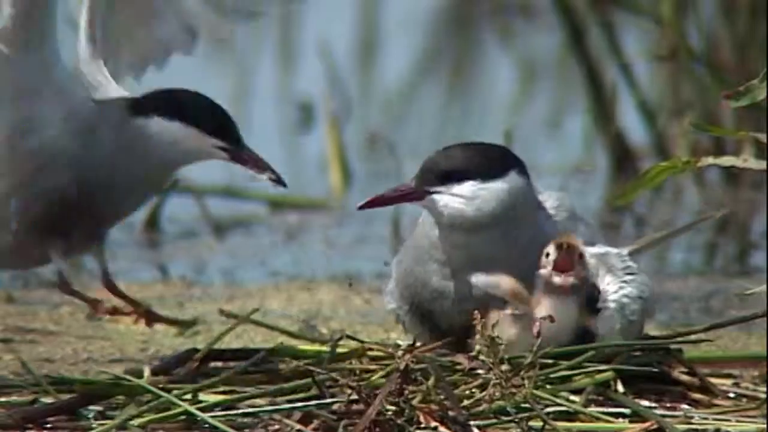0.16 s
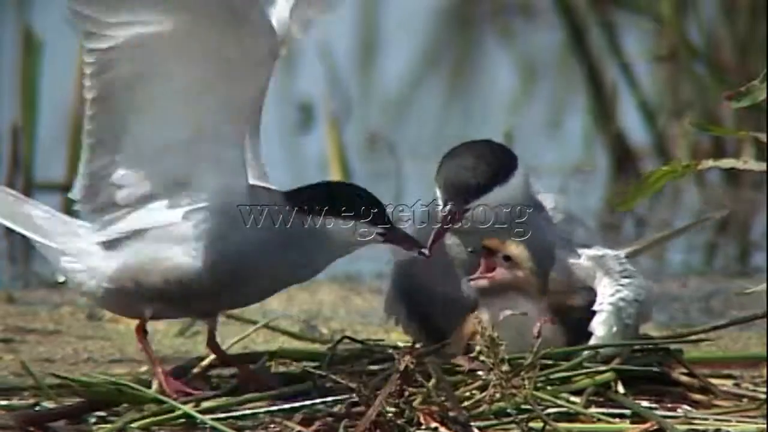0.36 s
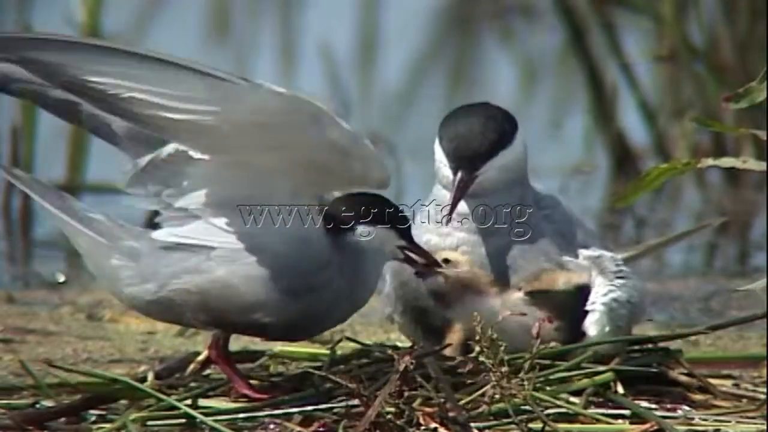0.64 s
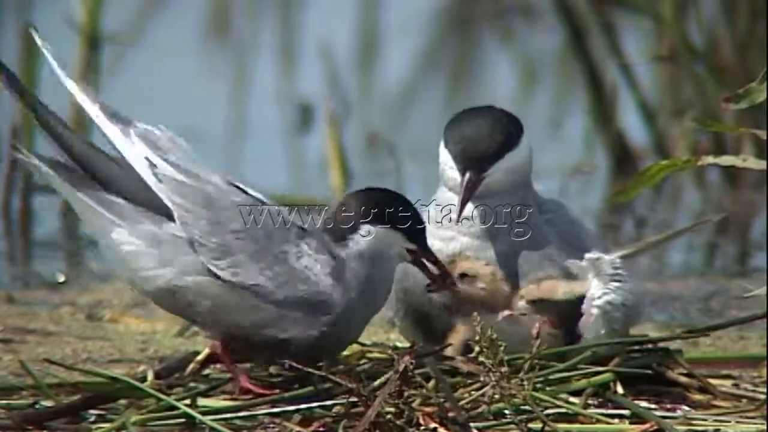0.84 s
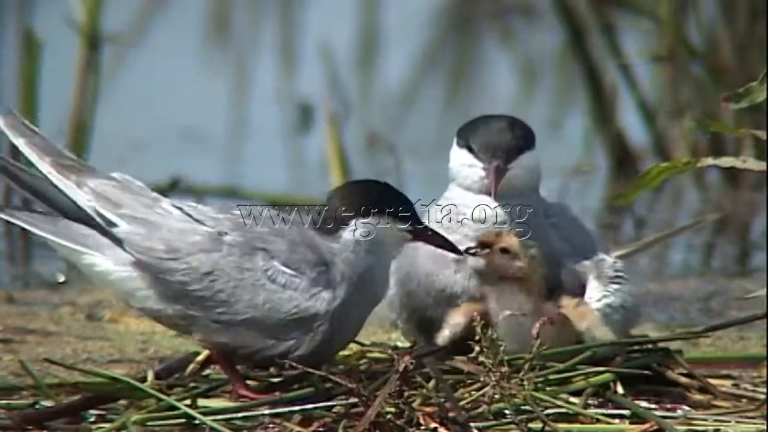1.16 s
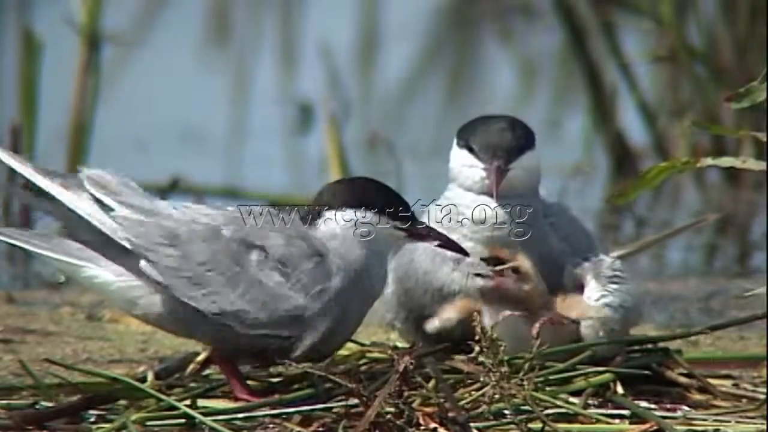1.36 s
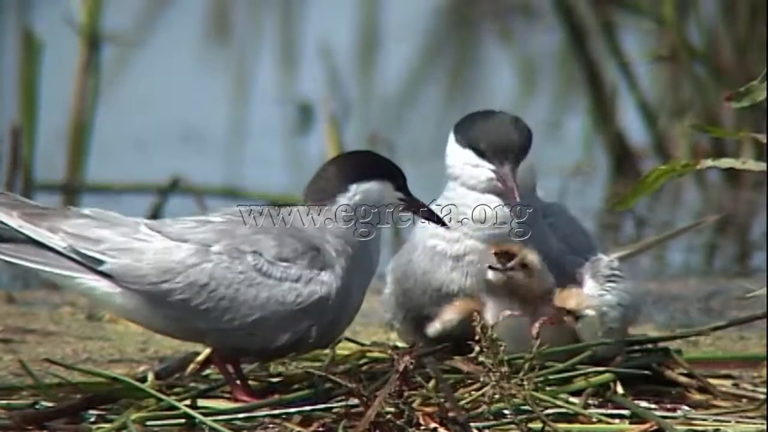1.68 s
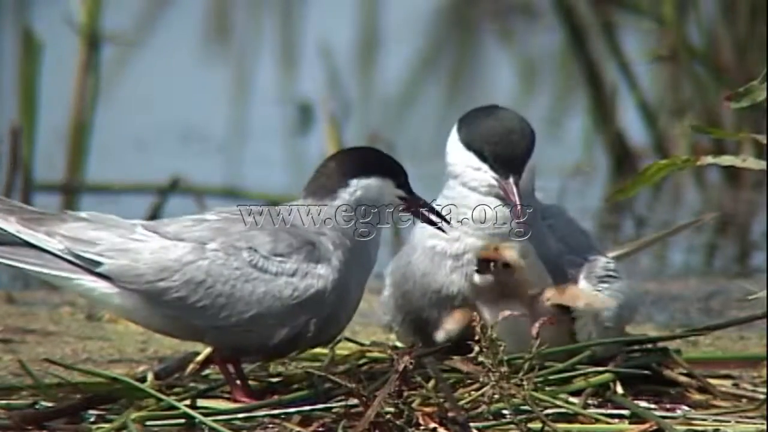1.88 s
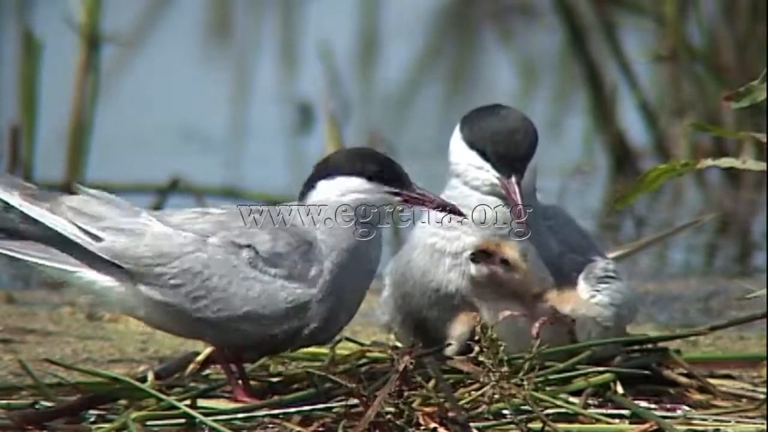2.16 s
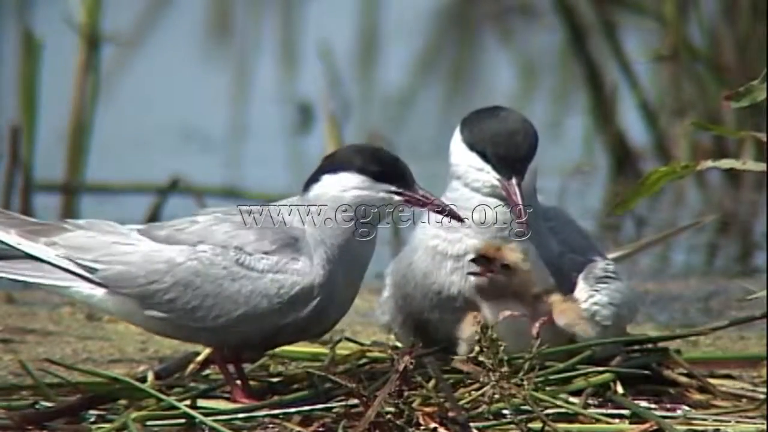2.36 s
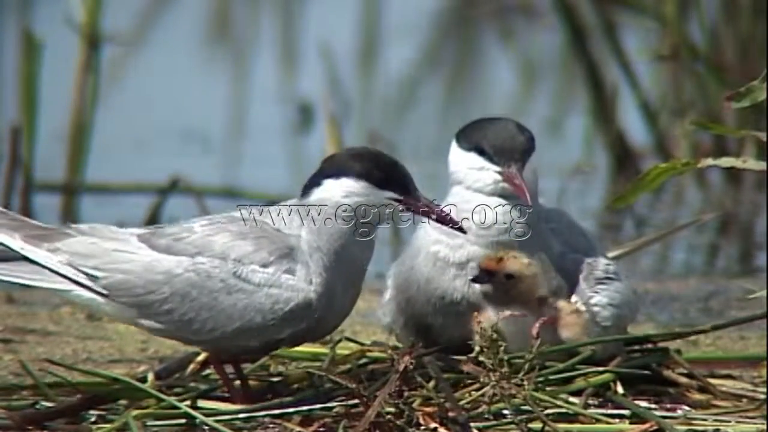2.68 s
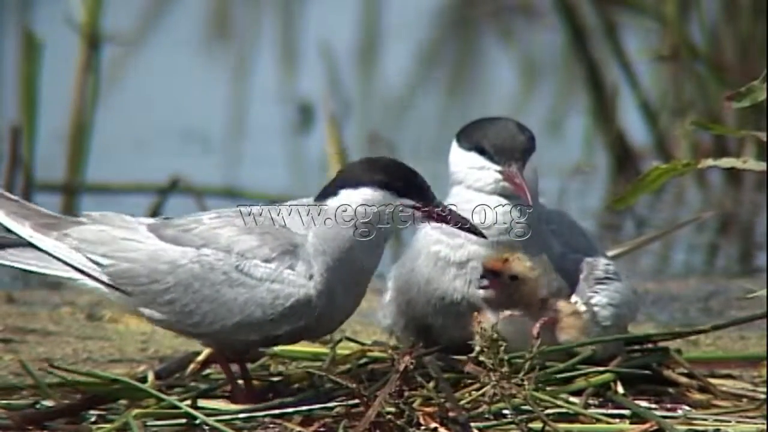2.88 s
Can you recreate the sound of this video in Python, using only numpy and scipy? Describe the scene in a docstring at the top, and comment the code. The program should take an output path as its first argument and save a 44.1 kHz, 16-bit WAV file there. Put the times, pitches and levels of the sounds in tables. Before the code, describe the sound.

Raspy tern calls at a marsh nest, with distant birds, faint peeps and low wind.

```python
"""Terns at a marsh nest

Terns rasp close by: each call is a rattle of about 100 noisy throat pulses a second.
Farther off the colony answers with rasps and whistles, chicks peep and a frog croaks in two bouts.
Wings flap, stems tick, a drop plops, and wind rumbles on the microphone."""
import sys
import numpy as np
from scipy import signal
from scipy.fft import rfft, irfft, next_fast_len
from scipy.io import wavfile

SR = 44100
rng = np.random.default_rng(int(sys.argv[2]) if len(sys.argv) > 2 else 0)


def to_wav(sig):
    """Store sig (one row per channel, or 1-D mono) as 16-bit WAV at the path in sys.argv[1].

    Samples outside -1..1 are clipped; the rate is SR.
    """
    pcm = np.clip(np.atleast_2d(sig), -1, 1) * 32767
    pcm = np.round(pcm).astype(np.int16)
    wavfile.write(sys.argv[1], SR, pcm.T)  # frames by channels


N = 133623
T = np.arange(N) / SR


def near_terns():
    """The throat opens in fluttering pulses, each a puff of air through the beak with a rough tone."""
    # Each row: start in seconds, pulse count, pulses a second, level in dB, mid-call swell in dB,
    # level change by the end in dB, first and last throat pitch in Hz, tone against breath in dB.
    calls = [(0.0691, 3, 99.4, -46, 2, -5.5, 2000, 1884, -2),
             (.127, 12, 101, -52, 1, -3.5, 3500, 2735, -12),
             (1.0059, 13, 102, -48.5, 2.5, -4, 3950, 2405, -1.5),
             (2.212, 13, 104, -58, -1.5, 2, 3700, 3280, -6)]
    # How throat and beak ring, one list per call. Each pair: frequency in Hz, level in dB.
    beaks = [
        [(530, -58), (900, -29), (1680, -13), (1840, -3.5), (2100, -5.5), (2300, -38), (2600, -5), (3760, -19),
         (4210, -31), (5620, -9), (6800, -26), (13000, -39)],
        [(530, -46), (900, -16.5), (998, -19), (1240, -24), (1960, -5), (2130, -18), (2770, -3), (3910, -10.5),
         (4290, -12.5), (6120, -9), (7190, -22), (9580, -19), (14000, -40)],
        [(530, -40), (900, -21), (964, -20), (1160, -21), (1490, -13.5), (1620, -17), (1880, -7), (2080, -8.5),
         (2230, -9), (2560, -5.5), (2770, -10.5), (3610, -11), (4650, -11.5), (5720, -16), (6710, -10.5),
         (7360, -34), (7880, -15), (8450, -23), (9150, -16.5), (10400, -30), (14000, -37)],
        [(590, -36), (1000, -19), (1350, -4), (1630, -24), (1960, 4.5), (2160, -5), (3760, 2.5), (5280, -7.5),
         (5630, -11), (9000, -44), (11700, -67), (19800, -120)],
    ]
    flutter_hz, treble_hz = 398, 5800
    out = np.zeros(N)
    for call, beak in zip(calls, beaks):
        start, count, rate, db, swell_db, fade_db, first_hz, last_hz, tone_db = call
        length = count / rate
        t = clock(length)
        progress = t / length
        cycles = rate * (t - 0.003 * (1 - np.exp(-t / 0.016)))  # the rattle starts a little slow
        within, pulse = cycles % 1, cycles.astype(int)
        strength, flutter_spread = rng.standard_normal((64, 2))[pulse].T
        opening = gate(within, 0.78 - 0.16 * progress, rise=0.1, fall=0.2)
        flutter = 1 + 0.52 * np.sin(2 * np.pi * flutter_hz * (1 + 0.24 * flutter_spread) * within / rate)
        airflow = unit(opening * flutter * undb(-0.9 * strength) + undb(-17))  # some air always leaks
        bite = unit(gate(within, 0.58, rise=0.1, fall=0.2)) * undb(-5)  # treble comes early in a pulse
        noise = rng.standard_normal(SR // 2)[:len(t)]
        low = signal.sosfiltfilt(signal.butter(3, treble_hz, fs=SR, output="sos"), noise)
        puffs = unit(tint(low * airflow + (noise - low) * bite, beak))
        hz = last_hz + (first_hz - last_hz) * np.exp(-(t / 0.018) ** 2)
        sag = 0.28 * (within - 0.34)  # the pitch drops during each pulse
        phase = turn(hz * (1 - sag + 0.0532 * wander(1500, len(t))))
        tone = unit(np.sin(phase) + undb(-17) * np.sin(2 * phase) + undb(-22) * np.sin(3 * phase))
        voice = (puffs + undb(tone_db) * tone * airflow) / np.hypot(1, undb(tone_db))
        level = undb(db + swell_db * np.sin(np.pi * progress) + fade_db * progress)
        add(out, start, voice * gate(t, length, 0.00024, 0.0028) * level)
    return out


def colony():
    """Farther terns rasp: uneven puffs of air ring in the throat at a sliding pitch."""
    # Each row: start and length in seconds, level in dB, first and last pitch in Hz,
    # width of the noise band in Hz, pulses a second.
    rasps = [(0.098, 0.042, -52.5, 3000, 3290, 1280, 100), (0.237, .07, -62.5, 2900, 2506, 2300, 110),
             (.24, 0.078, -63, 5900, 5770, 1410, 100), (0.336, 0.044, -65.5, 7000, 7040, 2430, 170),
             (0.238, 0.23, -76, 7560, 7600, 2480, 130), (.54, .11, -81.5, 9800, 10000, 910, 120),
             (0.44, 0.029, -60.5, 6800, 6070, 1490, 210), (0.539, .11, -59, 3200, 2266, 1220, 100),
             (0.547, 0.077, -69, 6100, 5650, 700, 120), (0.636, 0.12, -64, 5200, 5700, 613, 150),
             (0.699, 0.052, -55, 2500, 2182, 2130, 140), (0.73, 0.077, -65.5, 5600, 5130, 554, 130),
             (0.747, 0.028, -61.5, 2400, 2275, 1480, 99), (0.962, 0.062, -66.5, 2400, 2440, 1700, 150),
             (1.135, 0.16, -64.5, 3300, 2700, 1920, 110), (1.289, 0.051, -59, 2100, 2026, 1400, 95),
             (1.333, .025, -68, 6200, 5940, 1010, 210), (1.375, 0.087, -67.5, 5750, 5930, 805, 130),
             (1.431, 0.11, -67.5, 3900, 3360, 1400, 120), (1.541, 0.053, -59.5, 2100, 1905, 1480, 144),
             (1.575, 0.092, -60.5, 5900, 5270, 1060, 158), (1.597, 0.063, -63.5, 2700, 2210, 1000, 170),
             (1.71, 0.26, -73.5, 3700, 3810, 786, 100), (1.791, 0.064, -77, 6600, 6540, 900, 150),
             (1.948, 0.077, -65.5, 2550, 2407, 600, 110), (2.091, 0.047, -59.5, 2100, 2527, 1690, 118),
             (2.149, 0.074, -61, 3600, 3540, 1370, 110), (2.214, .035, -53, 3700, 3397, 1280, 100),
             (2.271, 0.072, -59.5, 3660, 3000, 2000, 125), (2.315, 0.074, -54, 2597, 2470, 1230, 97),
             (2.541, 0.11, -72, 6100, 5550, 820, 150), (2.683, 0.061, -62, 3500, 3060, 1190, 140),
             (2.755, 0.089, -73, 5900, 5670, 700, 220), (2.83, 0.056, -66, 4000, 3600, 1220, 130),
             (2.84, 0.17, -75, 6400, 6300, 1090, 98), (2.94, 0.07, -64.5, 3800, 3460, 890, 124)]
    out = np.zeros(N)
    for start, length, db, first_hz, last_hz, width_hz, rate in rasps:
        t = clock(length)
        hz = np.linspace(first_hz, last_hz, len(t))
        rattle = 1 + 0.62 * np.sin(turn(rate * (1 + 0.098 * wander(90, len(t)))))
        pulses = unit(rattle * undb(2.3 * wander(110, len(t))))
        voice = resonance(hz, width_hz, len(t)) + undb(-21) * resonance(hz, 6800, len(t))
        add(out, start, voice * pulses * gate(t, length, 0.008, 0.013) * undb(db))
    return out


def whistle():
    """A bird whistles one clear, wavering note."""
    # Each row: time in seconds, pitch in Hz, level in dB.
    path = [(0.25, 3440, -59), (0.27, 3550, -50.5), (0.308, 3420, -56), (0.338, 3565, -54),
            (0.352, 3495, -61), (0.366, 3575, -67), (0.38, 3559, -73)]
    times, hz, db = np.array(path).T
    pitch = np.interp(T, times, hz) * (1 + 0.0055 * wander(500, N))
    level = undb(np.interp(T, times, db)) * gate(T - times[0], times[-1] - times[0], 0.0055, 0.01)
    return np.sqrt(2) * np.sin(turn(pitch)) * level


def chicks():
    """Chicks peep: each hoarse note rises and falls in a lopsided arch."""
    # Each row: middle and length in seconds, top pitch in Hz, level in dB.
    peeps = [(0.486, 0.09, 4670, -69), (0.846, .06, 4520, -70.5), (1.21, 0.067, 4560, -67.5),
             (1.338, 0.062, 4780, -69), (1.47, .06, 4760, -68.5), (1.549, 0.05, 4460, -65),
             (1.583, 0.029, 4310, -60.5), (1.62, 0.036, 4730, -64.5), (1.789, 0.061, 4720, -69),
             (1.813, 0.025, 4230, -67.5), (1.957, 0.044, 4750, -67), (2.133, 0.057, 4670, -67),
             (2.43, .062, 4580, -66.5), (2.467, .06, 4830, -66.5), (2.652, 0.096, 4730, -66),
             (2.831, 0.066, 4720, -66), (3.02, 0.058, 4740, -65)]
    out = np.zeros(N)
    for (middle, length, hz, db), lean in zip(peeps, rng.standard_normal(len(peeps))):
        t = clock(length)
        arc = 2 * t / length - 1
        pitch = hz * (1 - 0.15 * arc ** 2 * (1 + 0.2 * lean * arc))
        tone = np.sin(turn(pitch * (1 + 0.008 * wander(700, len(t)))))
        breath = undb(-12) * resonance(pitch, 700, len(t))
        swell = (1 - 0.88 * arc ** 2) * gate(t, length, 0.0031, 0.0028)
        flicker = undb(2.1 * wander(200, len(t)))
        add(out, middle - length / 2, unit((tone + breath) * swell * flicker) * undb(db))
    return out


def piping():
    """Distant birds pipe short notes that slide and waver."""
    # Each row: start and length in seconds, level in dB, first and last pitch in Hz.
    notes = [(0.536, 0.048, -66, 3400, 3336), (1.283, 0.057, -66.5, 2434, 2330),
             (1.544, 0.046, -58.5, 2344, 2364), (1.613, 0.068, -63, 2150, 1996),
             (1.6, .07, -67.5, 3020, 2700), (0.743, 0.06, -71, 5430, 5050),
             (2.766, 0.081, -67.5, 5880, 5820), (2.089, 0.077, -60.5, 2285, 2424),
             (2.329, 0.043, -62, 2380, 2350), (2.529, 0.16, -71.5, 3055, 3120),
             (2.526, 0.089, -75, 4520, 4680), (2.651, 0.061, -68, 1280, 1256),
             (2.663, 0.048, -66, 3840, 3770), (2.684, 0.11, -77.5, 5000, 5030),
             (2.782, 0.061, -69, 3040, 3150), (2.89, 0.072, -67, 4680, 4790),
             (2.928, 0.05, -66, 1281, 1212), (2.936, 0.048, -66, 3820, 3680)]
    out = np.zeros(N)
    for start, length, db, first_hz, last_hz in notes:
        t = clock(length)
        waver = 1 + 0.016 * wander(700, len(t)) + 0.009 * wander(40, len(t))
        tone = np.sin(turn(np.linspace(first_hz, last_hz, len(t)) * waver))
        flicker = undb(2.8 * wander(120, len(t)))
        add(out, start, unit(tone * gate(t, length, 0.012, 0.02) * flicker) * undb(db))
    return out


def frog():
    """A frog gives bouts of short, buzzing croaks that grow louder."""
    # Each row: start and length in seconds, croaks a second, level in dB, growth in dB.
    bouts = [(0.341, .265, 26.5, -63.5, 8.5), (1.658, .262, 26, -64.5, 4)]
    buzz_hz = 423.7
    out = np.zeros(N)
    for start, length, rate, db, growth_db in bouts:
        t = clock(length)
        croaks = gate(t * rate % 1, 0.8, rise=0.22, fall=0.22)
        buzz = 1 + 0.64 * np.sin(2 * np.pi * buzz_hz * t)
        throat = resonance(hz=1288, width_hz=330, size=len(t))
        add(out, start, unit(throat * croaks * buzz * undb(growth_db * t / length)) * undb(db))
    return out


def ticks():
    """Stems and bills tick: each tap rings and quickly dies away."""
    # Each row: start in seconds, level before fading in dB, pitch in Hz, width of the noise band in Hz.
    taps = [(0.828, -59, 5700, 910), (1.573, -54, 5140, 2400), (1.708, -63, 5470, 1800),
            (1.809, -56.5, 6070, 595), (2.052, -52.5, 1945, 1980), (2.072, -57, 1930, 1830),
            (2.099, -57, 1660, 1600), (2.25, -51, 5200, 400)]
    out, t = np.zeros(N), clock(0.081)
    fade = gate(t, t[-1], 0.0017, 0.0089) * np.exp(-t / 0.0066)
    for start, db, hz, width_hz in taps:
        add(out, start, resonance(hz, width_hz, len(t)) * fade * undb(db))
    return out


def drop():
    """A drop plops with a very short, falling tone."""
    peak_s, peak_db = 0.0019, -45
    out, t = np.zeros(N), clock(0.081)
    hz = np.maximum(1183 - 13000 * t, 820)
    ring = t / peak_s * np.exp(1 - t / peak_s)
    add(out, start=2.199, sound=np.sin(turn(hz)) * ring * undb(peak_db))
    return out


def wings():
    """Folding wings push one low puff of air."""
    # Each row: frequency in Hz, level in dB.
    colour = [(18, -33), (30, 0.5), (91, -7), (172, -14.5), (599, -25.5), (967, -28.5), (1200, -43),
              (1560, -75), (2640, -120)]
    peak_s, spread_s = 0.93, 0.054
    return coloured(colour) * np.exp(-((T - peak_s) / spread_s) ** 2) * undb(-53)


def wind():
    """Gusts rumble on the microphone; as the breeze picks up, swirls of air brighten the rumble."""
    # Each row: time in seconds, gust strength in dB.
    gusts = [(0.07, -55.5), (0.7, -62.5), (0.93, -55), (0.96, -47), (1.07, -56.5), (1.21, -49.5),
             (1.42, -59), (1.56, -49), (1.82, -48), (1.91, -53), (2.05, -45), (2.09, -48), (2.93, -52),
             (3.03, -46)]
    # Each row: frequency in Hz, level of the rumble in dB.
    colour = [(12, -43.5), (20, -17.5), (51, 4.5), (93, 1.5), (198, -10), (381, -26), (414, -33.5),
              (451, -30), (528, -44.5), (600, -32), (780, -63), (1320, -120)]
    swirl_hz, swirl_octaves, swirl_start_s, swirl_rise_s = 122, 0.65, 1.62, 0.65
    times, db = np.array(gusts).T
    rumble = coloured(colour) * undb(np.interp(T, times, db) - 0.86 + 0.64 * wander(25.18, N))
    swirls = shaped(lambda f: np.exp(-(np.log2(f / swirl_hz) / swirl_octaves) ** 2))
    return rumble + swirls * np.clip((T - swirl_start_s) / swirl_rise_s, 0, 1) * undb(-55.5)


def marsh():
    """Reeds, water and the far colony blend into a soft wash."""
    # Each row: frequency in Hz, level in dB.
    colour = [(180, -5), (300, 1), (652, -3), (1240, -2.5), (1370, -6), (1670, -11.5), (1910, -5),
              (2980, -4.5), (4070, -7), (4650, -5), (5210, -13), (6250, -12.5), (7370, -19.5),
              (15500, -20.5)]
    return coloured(colour) * undb(-65 + 1.2 * wander(10, N))


def echo(sound, fade_s=0.24):
    """Reeds and water scatter the sound back as a short, duller tail."""
    t = clock(0.5)
    tail = rng.standard_normal(len(t)) * undb(-60 * t / fade_s) * np.clip(t / 0.015, 0, 1)
    tail = signal.sosfilt(signal.butter(1, 6000, fs=SR, output="sos"), tail)
    return signal.fftconvolve(sound, tail / np.sqrt(2 * np.sum(tail ** 2)))[:N]


def whine(hz=15625, db=-95.5):
    """A camera gives off a faint, very high tone."""
    return np.sqrt(2) * undb(db) * np.sin(2 * np.pi * hz * T)


def undb(db):
    """Turn decibels into a number to multiply by."""
    return 10 ** (np.asarray(db) / 20)


def unit(sound):
    """Scale a sound to an average (rms) level of 1."""
    return sound / np.sqrt(np.mean(sound ** 2))


def shaped(gain):
    """Noise at level 1; gain(Hz) sets the share of each frequency."""
    size = next_fast_len(N)
    f = np.maximum(np.arange(size // 2 + 1) * SR / size, 1)
    return unit(irfft(rfft(rng.standard_normal(size)) * gain(f), size)[:N])


def coloured(points):
    """Noise that follows (Hz, dB) points and falls steeply outside them."""
    hz, db = np.array(points).T
    return shaped(lambda f: undb(np.interp(np.log(f), np.log(hz), db))
                  * np.minimum(1, np.minimum(f / hz[0], hz[-1] / f)) ** 2)


def tint(sound, points):
    """Filter a sound through a curve of (Hz, dB) points."""
    hz, db = np.array(points).T
    size = next_fast_len(len(sound) + 4096)
    f = np.maximum(np.arange(size // 2 + 1) * SR / size, 1)
    gain = undb(np.interp(np.log(f), np.log(hz), db))
    return irfft(rfft(sound, size) * gain, size)[:len(sound)]


def wander(rate, size):
    """Drift between random values, rate times a second."""
    values = rng.standard_normal(2048)
    return np.interp(np.arange(size) * rate / SR % 2047, np.arange(2048), values)


def turn(hz):
    """The running angle (phase) of a wave, in radians."""
    return 2 * np.pi * np.cumsum(hz) / SR


def resonance(hz, width_hz, size):
    """A band of airy noise around a pitch that may move."""
    lowpass = signal.butter(2, min(width_hz / 2, SR / 4), fs=SR, output="sos")
    a, b = signal.sosfilt(lowpass, rng.standard_normal((2, SR // 2)))[:, -size:]
    phase = turn(hz * np.ones(size))
    return unit(a * np.cos(phase) + b * np.sin(phase))


def clock(length):
    """Time within one event, at most half a second."""
    return np.arange(min(int(length * SR), SR // 2)) / SR


def gate(t, length, rise, fall):
    """Fade in, hold, fade out."""
    return np.clip(t / rise, 0, 1) * np.clip((length - t) / fall, 0, 1)


def add(out, start, sound):
    """Mix a sound in at its start time in seconds."""
    i = max(int(start * SR), 0)
    out[i:i + len(sound)] += sound[:max(N - i, 0)]


def scene():
    """Everything sits in the middle; a faint hiss sets left and right apart."""
    near = near_terns() + ticks() + drop() + wings()
    croaks = frog()
    far = colony() + whistle() + chicks() + piping()
    echoes = echo(undb(-10.5) * near + undb(-8.5) * far + undb(-7) * croaks)
    middle = near + far + croaks + echoes + wind() + marsh() + whine()
    hiss = shaped(lambda f: np.exp(-((f - 9500) / 3500) ** 2) + 0.14 / (1 + f / 1500)) * undb(-89)
    return np.array([middle + hiss, middle - hiss])


def record(dry):
    """The sound starts after a moment of silence; the highest treble is cut steeply."""
    start_s, top_hz = 0.0685, 15750
    opened = dry * np.clip((T - start_s) * 1000, 0, 1)
    return signal.sosfilt(signal.ellip(10, 0.2, 70, top_hz, fs=SR, output="sos"), opened)


dry = scene()
out = record(dry)
to_wav(out)
```